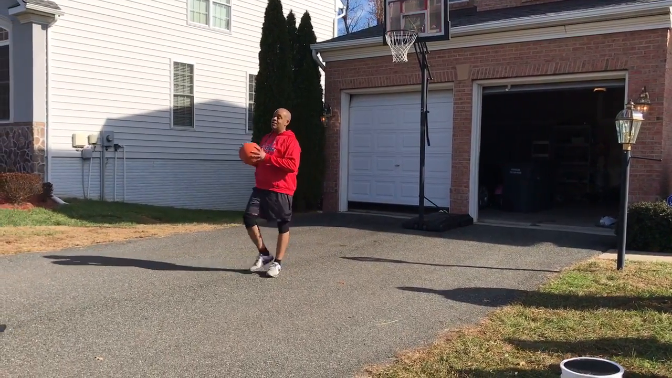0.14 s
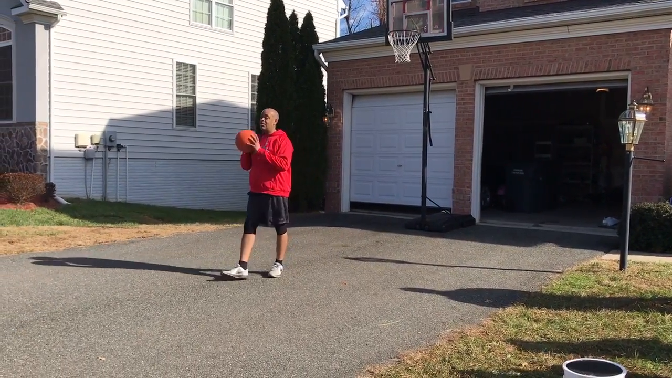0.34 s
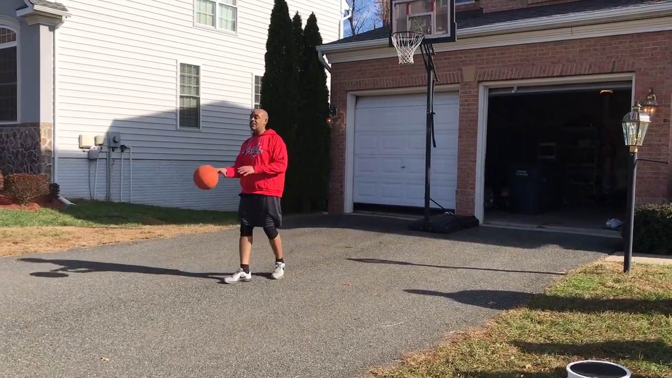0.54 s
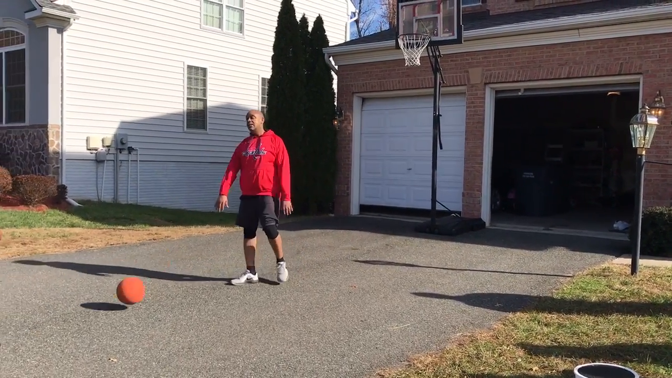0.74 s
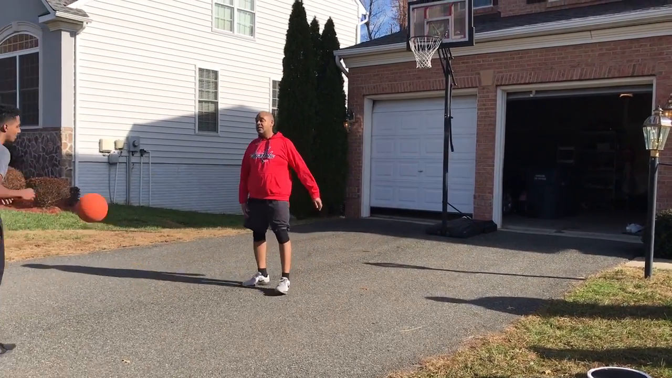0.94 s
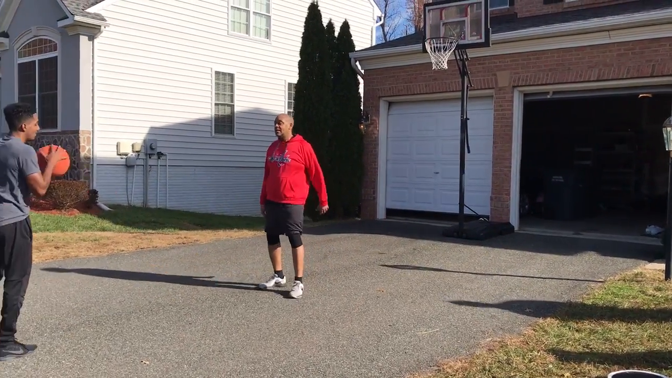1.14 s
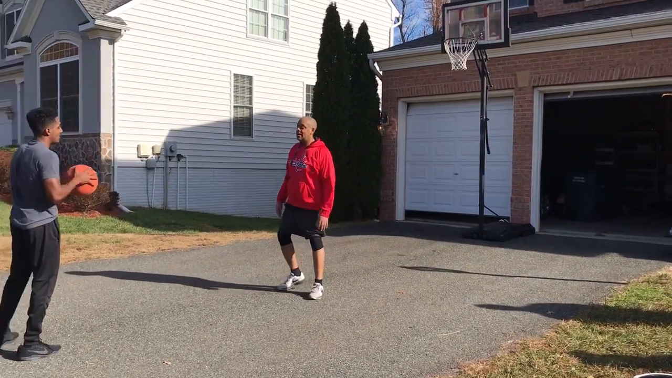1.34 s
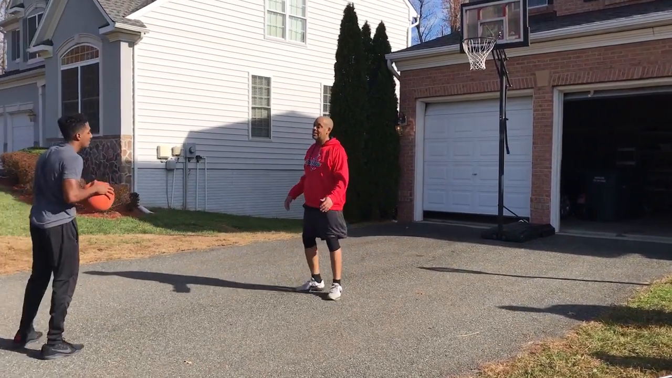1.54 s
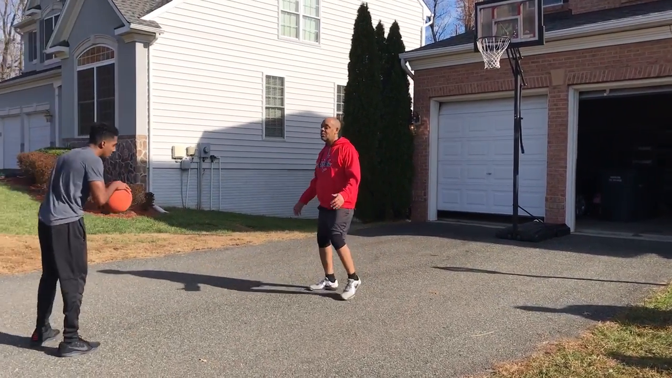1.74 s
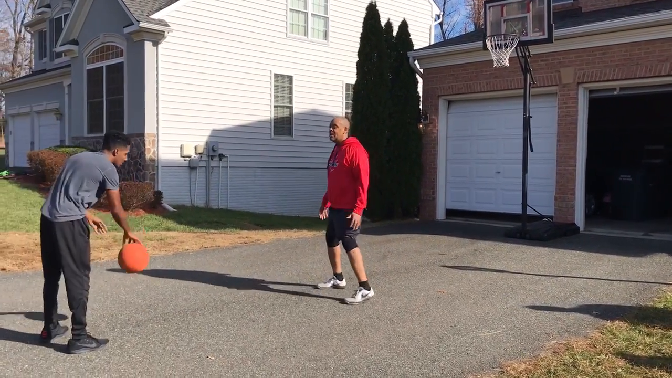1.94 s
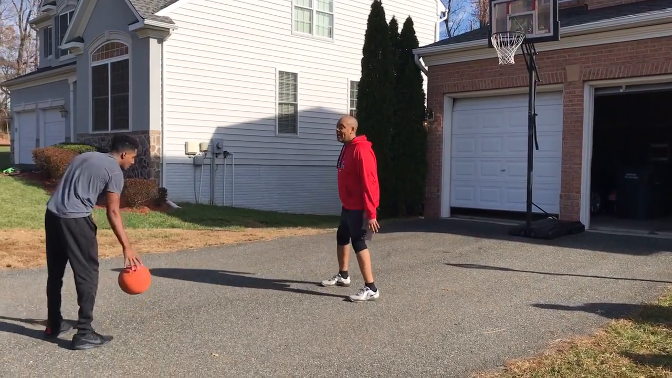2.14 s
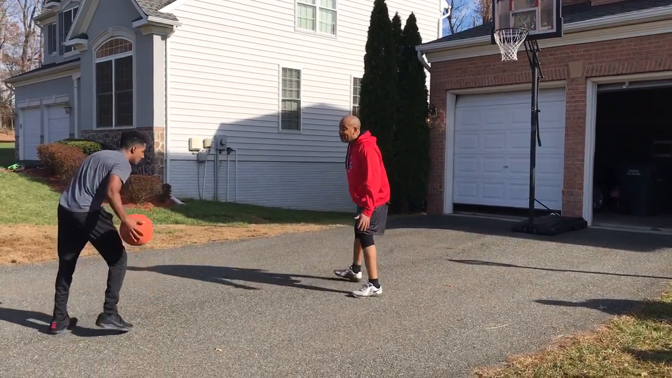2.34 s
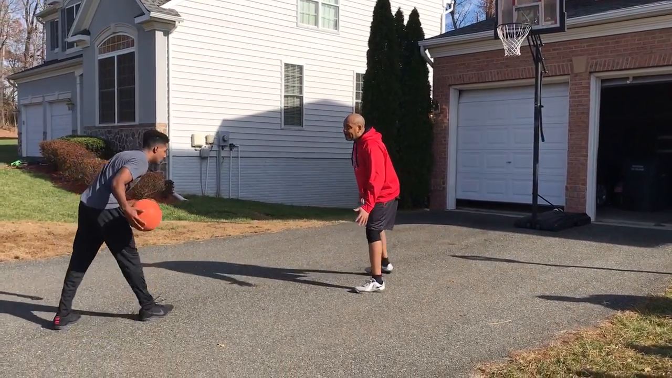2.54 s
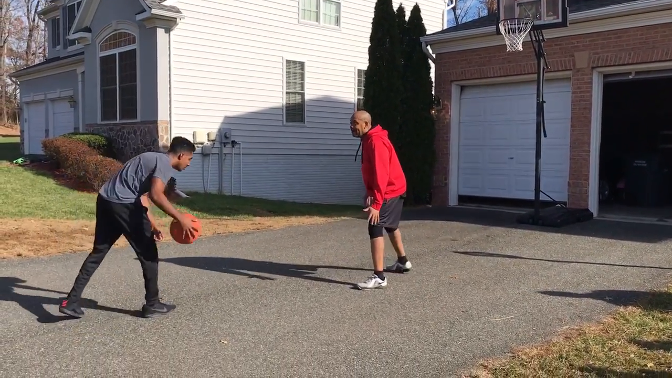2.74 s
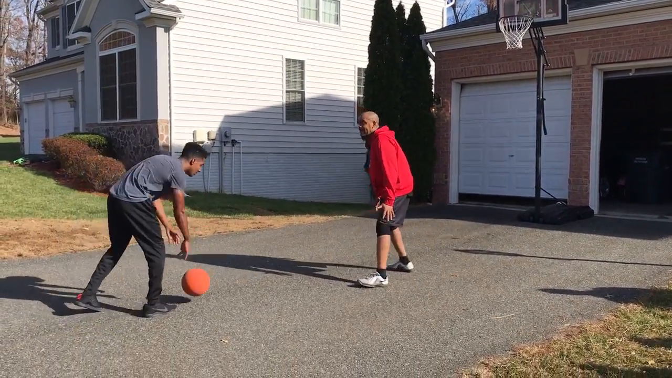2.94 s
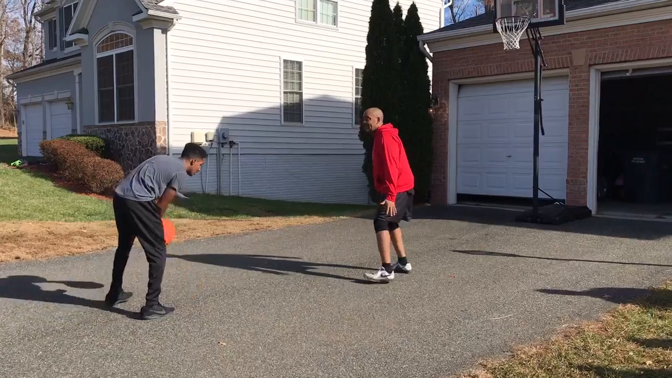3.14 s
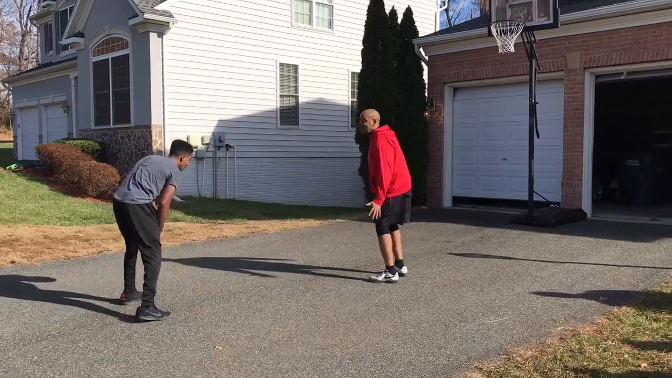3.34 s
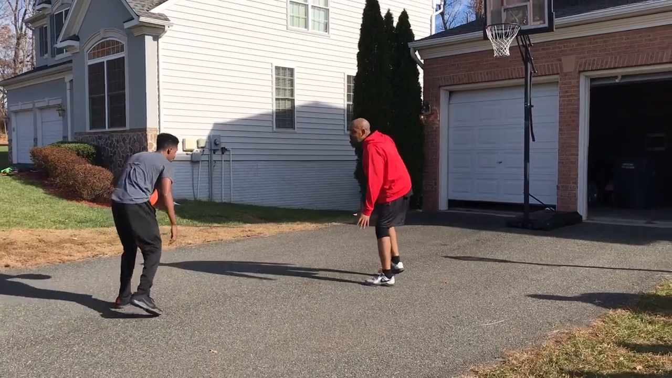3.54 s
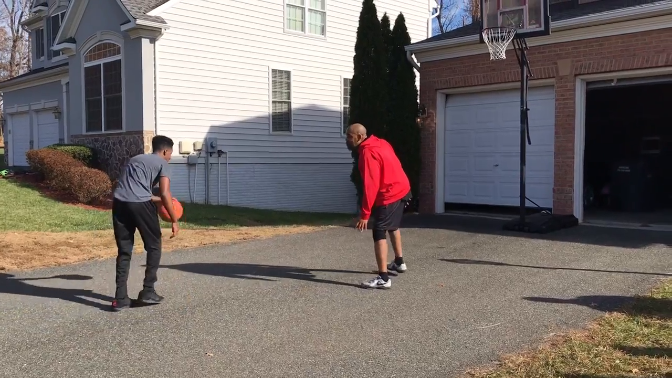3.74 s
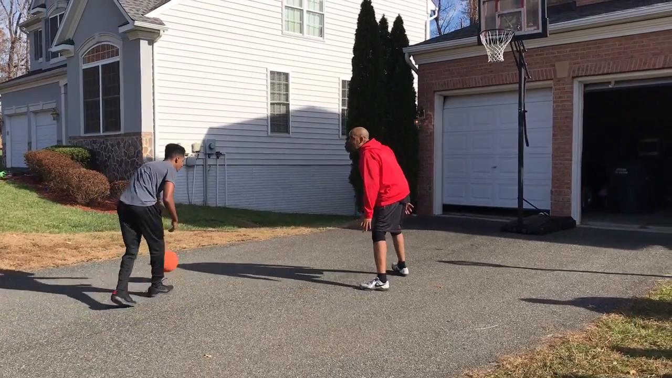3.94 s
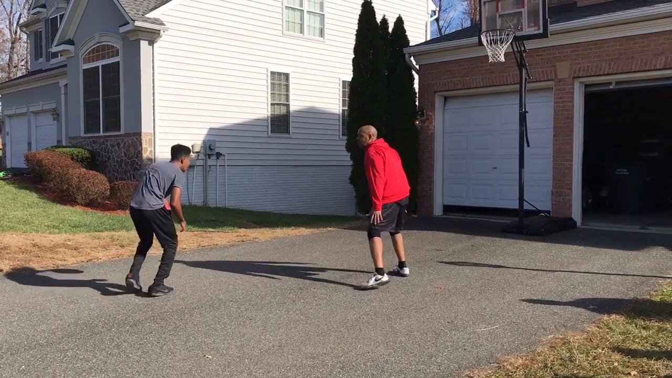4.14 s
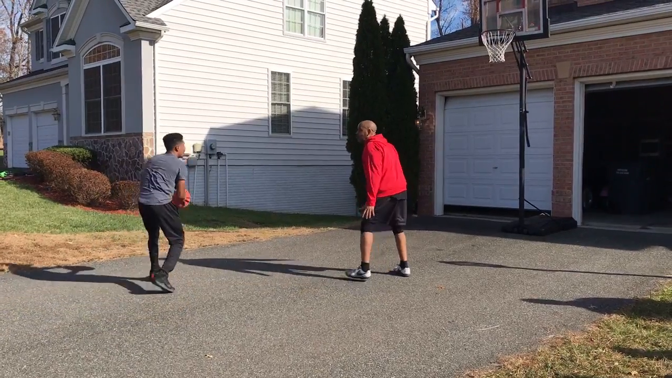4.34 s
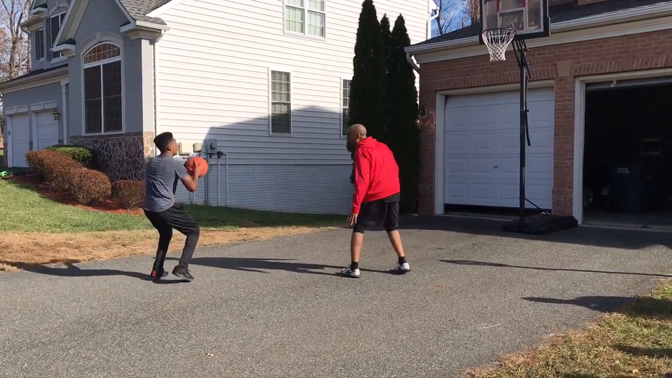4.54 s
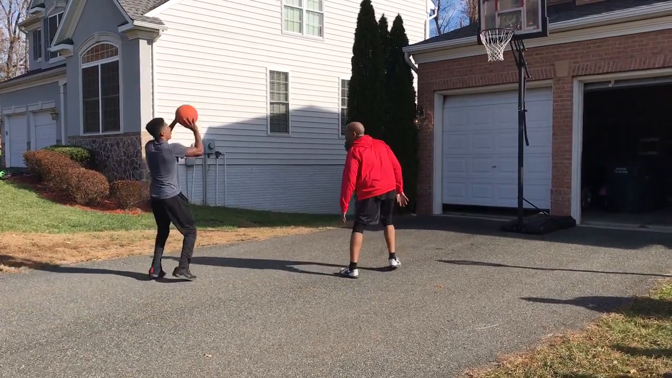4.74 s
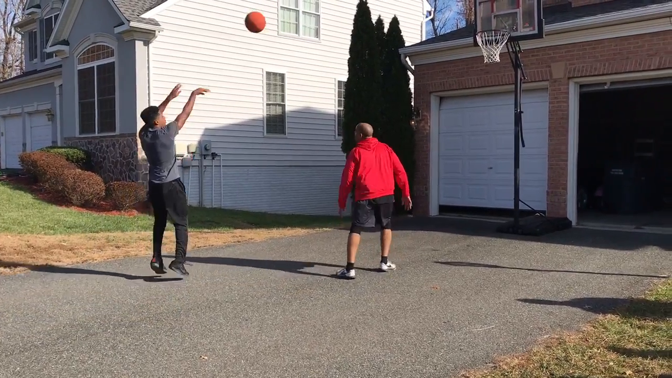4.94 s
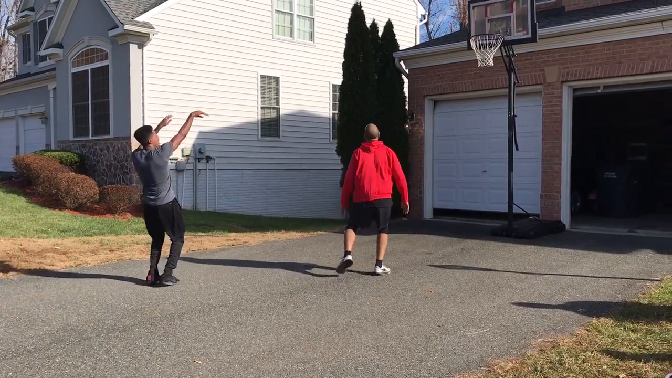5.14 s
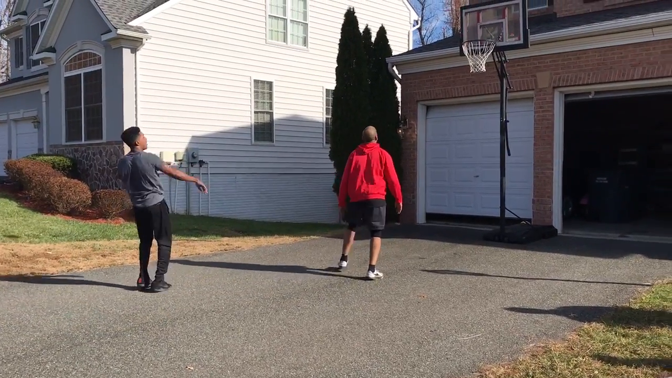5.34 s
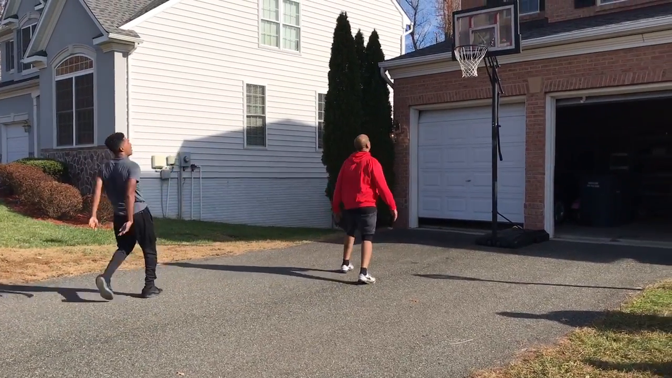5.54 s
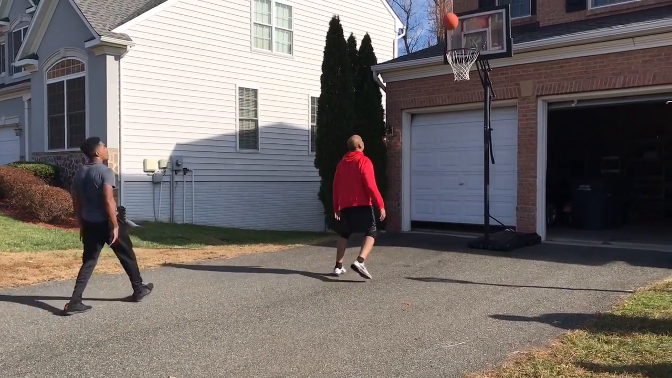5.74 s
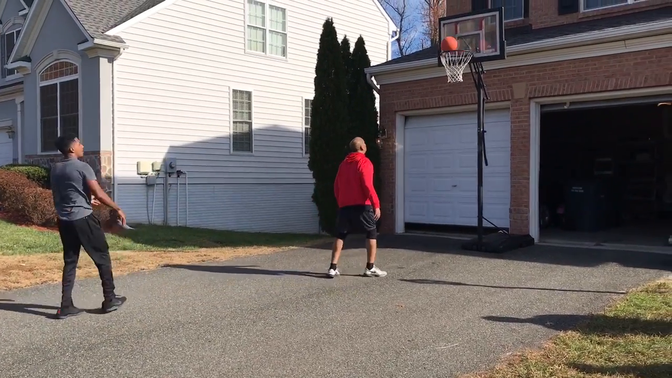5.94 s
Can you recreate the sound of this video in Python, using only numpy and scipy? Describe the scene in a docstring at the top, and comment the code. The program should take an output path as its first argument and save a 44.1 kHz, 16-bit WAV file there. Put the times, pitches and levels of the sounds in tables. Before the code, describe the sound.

Outdoors by houses, four sharp, hollow basketball bounces echo over faint traffic rumble, with hand taps and gritty steps, ending on a rattling rim hit.

```python
"""Basketball on a driveway

A basketball bounces four times on asphalt between houses, then strikes the hoop.
Each bounce layers a noisy slap, a falling thump and ringing air in the ball; filtered, smeared copies
are the walls' echoes. Bursts of noise make hand taps, scuffs and grit; sliding partials squeak.
Shaped noise gives clothes rustling close by and a low rumble of far traffic and the yard's low ringing."""
import sys
import numpy as np
from scipy import signal
from scipy.fft import rfft, irfft, next_fast_len
from scipy.io import wavfile
from scipy.ndimage import uniform_filter1d

SR = 44100
rng = np.random.default_rng(int(sys.argv[2]) if len(sys.argv) > 2 else 0)


def rack_gain(trim_db):
    """Turn a fader trim in dB into the linear factor to multiply a signal by."""
    fader = np.asarray(trim_db, float)
    return 10 ** (fader / 20)


def output_pcm(signal):
    """Save a mono or channel-first signal as 16-bit PCM at the path in sys.argv[1].

    Samples are clipped to [-1, 1] before scaling.
    """
    pcm = np.clip(np.atleast_2d(signal).T, -1, 1) * 32767
    wavfile.write(sys.argv[1], SR, np.round(pcm).astype(np.int16))


N = 264978
TIME = np.arange(N) / SR


def colour(spectrum):
    """Noise of unit power whose spectrum follows a drawn curve."""
    hz, db = np.transpose(spectrum)
    size = next_fast_len(N)
    log_hz = np.log(np.arange(1, size // 2 + 2) * SR / size)
    gain = rack_gain(np.interp(log_hz, np.log(hz), db))
    x = irfft(rfft(rng.standard_normal(size)) * gain, size)[:N]
    return x / x.std()


def band(x, low_hz, high_hz):
    """Band-pass with soft edges."""
    edges = [max(low_hz, 20), min(high_hz, SR / 2.2)]
    return signal.sosfilt(signal.butter(2, edges, "band", fs=SR, output="sos"), x)


def fade(t, t60):
    """Exponential decay that falls 60 dB in t60 seconds."""
    return np.exp(-np.log(1000) * t / t60)


def ring(modes, t, scatter_db):
    """Decaying sines all struck at once, each blow a little different in level and pitch."""
    hz, db, t60 = np.transpose(modes)[:, :, None]
    level_chance, pitch_chance = rng.standard_normal((2, len(modes), 1))
    tones = np.sin(2 * np.pi * hz * (1 + 0.0092 * pitch_chance) * t)
    return np.sum(rack_gain(db + scatter_db * level_chance) * tones * fade(t, t60), axis=0)


def shiver(bands, t):
    """Noise that dies away band by band; each band gets the full energy of its level and decay."""
    out = 0
    for low_hz, high_hz, db, t60 in bands:
        decay = fade(t, t60)
        x = band(rng.standard_normal(len(t)) * decay, low_hz, high_hz)
        out = out + rack_gain(db) * x * np.linalg.norm(decay) / np.linalg.norm(x)
    return out


def add(out, s, x):
    """Mixes x in from time s."""
    i = int(s * SR)
    out[i:i + len(x)] += x[:len(out) - i]


def walk(rate):
    """Smoothed random wander of spread 1, with a fresh value rate times a second."""
    k = int(SR / rate)
    x = uniform_filter1d(np.repeat(rng.standard_normal(N // k + 1), k), k)[:N]
    return x / x.std()


def grains(spread_db):
    """Noise of unit power made of uneven grains, 16 samples each."""
    loudness = np.repeat(rng.exponential(size=N // 16 + 1), 16)[:N]
    x = rng.standard_normal(N) * rack_gain(spread_db * loudness)
    return x / x.std()


def burst(peak_db, low_hz, high_hz, rise_s, t60):
    """Short noise burst through one broad resonance, set to a peak level."""
    t = TIME[:SR // 10]
    x = band(rng.standard_normal(len(t)) * fade(t, t60) * np.minimum(t / rise_s, 1), low_hz, high_hz)
    return rack_gain(peak_db) * x / np.abs(x).max()


# low rumble, far traffic plus the yard's low ringing after each bounce: t/s, gain/dB
RUMBLE_LEVEL = [(0.0, -51.5), (0.73, -58.5), (1.15, -52), (1.9, -60), (2.35, -50), (2.7, -56), (3.3, -55),
                (4.2, -52.5), (5.06, -54), (5.43, -54.5), (6.0, -58.5)]
# spectrum of the outdoor air before it is set to unit power: f/Hz, level per Hz/dB
TOWN_SPECTRUM = [(12, -56), (20, -32), (43, -5), (101, -2), (120, -3.5), (142, -13), (228, -19), (262, -25),
                 (367, -27.5), (718, -29), (1290, -33), (2140, -37.5), (2530, -38.5), (9670, -50.5),
                 (16000, -51.5)]


def town():
    """A wavering rumble of far traffic and the yard's low ringing, under smooth hiss; one noise split."""
    air = colour(TOWN_SPECTRUM)
    low = band(air, 32, 256)
    rumble = rack_gain(np.interp(TIME, *np.transpose(RUMBLE_LEVEL))) * low * rack_gain(0.59 * walk(4.6))
    hiss = rack_gain(-52.5) * (air - low) * rack_gain(0.14 * walk(2.79))
    return rumble + hiss


# steady brushing of cloth between the strokes: t/s, gain/dB
FIDGET = [(0, -73), (.6, -78), (.95, -67.5), (1.35, -61), (1.55, -74.5), (2.1, -67), (2.35, -76),
          (2.85, -66), (3.3, -82), (6, -98)]
# strokes of cloth, added to the steady brushing: start t/s, length t/s, gain/dB
CLOTH_STROKES = [(0.022, 0.24, -70), (0.257, 0.2, -64.5), (0.537, 0.15, -68.5), (1.807, 0.12, -67.5),
                 (1.91, 0.12, -72.5), (2.11, 0.17, -64), (2.186, 0.066, -53), (2.534, 0.14, -70),
                 (2.92, 0.11, -71), (3.043, 0.083, -67), (3.148, 0.1, -56), (3.356, 0.083, -60.5),
                 (3.941, 0.16, -68), (4.425, 0.14, -67), (4.699, 0.044, -52)]
# cloth as the microphone picks it up, with the microphone's dip near 10.4 kHz, before it is set to
# unit power: f/Hz, level per Hz/dB
CLOTH_AT_MICROPHONE = [(1200, 1.5), (2500, -0.5), (4000, -1.5), (6000, -2), (8000, -4.5), (10400, -7.5),
                       (12300, -2.5), (15200, -9.5), (16300, -17)]


def rustle():
    """Fabric brushing in short strokes, bright and slightly grainy."""
    strokes = rack_gain(np.interp(TIME, *np.transpose(FIDGET)))
    for s, length, db in CLOTH_STROKES:
        add(strokes, s, rack_gain(db) * signal.windows.tukey(int(length * SR), .5))
    grain = rack_gain(2.4 * walk(60) + 0.74 * walk(330))
    return strokes * colour(CLOTH_AT_MICROPHONE) * grain


# hands on the ball and shoe taps: t/s, peak level/dB, middle of the resonance f/Hz
TAPS = [(0.189, -43, 1650), (.341, -41.5, 1990), (0.351, -31, 760), (0.3542, -36.5, 2080),
        (0.367, -34, 793), (0.3678, -42, 2500), (.376, -43, 1900), (.381, -43, 2000), (1.279, -27, 2000),
        (1.286, -37, 400), (1.566, -42, 630), (2.818, -45, 650), (3.38, -41.5, 740), (4.457, -44.5, 1510),
        (4.479, -35.5, 4300), (4.513, -53, 4160), (4.599, -49, 1510), (4.7, -41, 1500),
        (4.7195, -32.5, 1520), (4.986, -43, 1200), (5.153, -47, 637), (5.711, -45, 1640),
        (5.718, -37, 1710), (5.761, -40.5, 694), (5.785, -37, 1580)]


def taps():
    """Hand and shoe taps: short noise bursts in one broad resonance each."""
    out = np.zeros(N)
    for s, db, hz in TAPS:
        add(out, s, burst(db, hz / 2.5, hz * 1.6, rise_s=0.0011, t60=0.017))
    return out


# soles dragged on asphalt: start t/s, length before stretching t/s, rub level/dB, nominal rub f/Hz,
# body level/dB (both levels before the stroke shape)
SCUFFS = [(0.329, 0.075, -59, 1860, -50), (0.767, 0.035, -70.5, 1990, -60), (1.273, 0.02, -50.5, 2600, -54),
          (1.393, 0.036, -61, 4500, -59), (2.674, 0.088, -53.5, 2600, -53),
          (3.375, 0.045, -53.5, 2270, -52), (3.999, 0.033, -57.5, 2300, -60),
          (4.47, 0.025, -52, 3600, -54.5), (4.506, 0.032, -58.5, 3000, -67),
          (4.699, 0.035, -47.5, 2620, -52.5), (4.709, 0.023, -46, 1600, -52)]


def scuffs():
    """Rubber catching on grit: uneven grains bite fast and trail off over the dull body of the shoe."""
    out = np.zeros(N)
    friction = grains(1.8) * rack_gain(2.45 * walk(130))
    stretch, width = 1.36, 1.37  # stroke over listed length, rub bandwidth over nominal frequency
    for s, length, db, hz, body_db in SCUFFS:
        i, n = int(s * SR), int(stretch * length * SR)
        rub = band(friction[i:i + n], hz * (1 - width / 3), hz * (1 + 2 * width / 3))
        body = band(friction[i:i + n], 295, 1320)
        stroke = np.sin(np.pi * np.linspace(0, 1, n) ** 0.64) ** 0.95
        mixed = rack_gain(db) * rub / rub.std() + rack_gain(body_db) * body / body.std()
        add(out, s, mixed * stroke)
    return out


# grit cracking under soles: t/s, peak level/dB
GRIT_CRACKS = [(0.3978, -37), (0.404, -39), (0.4118, -42), (0.4257, -44.5), (0.4414, -46), (1.2243, -47),
               (2.1642, -48), (2.2257, -34), (2.6242, -46), (4.4472, -44), (5.5065, -46.5), (5.6257, -48),
               (5.7677, -41.5)]


def grit():
    """Grit cracks as ticks far shorter and brighter than the taps, with faint ones scattered between."""
    out = np.zeros(N)
    chance = rng.random((int(9.8 * N / SR), 2))  # 9.8 faint ticks a second
    faint = np.c_[chance[:, 0] * N / SR, -51.5 - 8.0 * chance[:, 1]]
    hz = 4540
    for s, db in [*GRIT_CRACKS, *faint]:
        add(out, s, burst(db, hz / 2.5, hz * 2.4, rise_s=0.00025235, t60=0.0039))
    return out


# yard tail before lumps and send level: low f/Hz, high f/Hz, level/dB, t60 t/s
YARD_BANDS = [(61, 137, -32.5, 0.96), (171, 356, -37, 0.45), (340, 860, -46, 0.25), (785, 1840, -43, 1),
              (1160, 1550, -42.5, 0.78), (1740, 2870, -47, 0.8), (2430, 4400, -39, 0.44),
              (4500, 9100, -53.5, 0.25), (8000, 16000, -57, 0.26)]


def yard():
    """Answer of the yard to a click: scattered, lumpy reflections in bands that decay separately."""
    t = TIME[:SR]
    lumps = rack_gain(2.1 * walk(70)[:SR] + 1.6 * walk(260)[:SR])
    return shiver(YARD_BANDS, t) * (1 - np.exp(-t / 0.008)) * lumps


# skin of the ball shivering, before the slap level: low f/Hz, high f/Hz, level/dB, t60 t/s
SKIN = [(250, 670, -23.5, 0.095), (780, 1350, -11.5, 0.023), (1276, 2330, -8, 0.025),
        (2300, 5200, -15, 0.0085), (4000, 6900, -16, 0.009), (6550, 10700, -24.5, 0.0025),
        (10500, 13600, -28.5, 0.0076)]
# air ringing inside the ball, before the slap level and scatter: f/Hz, level/dB, t60 t/s
BALL_AIR = [(953, -40, 0.33), (1200, -42, 0.33), (1400, -44, 0.34), (1496, -19.5, 0.055),
            (1974, -21.5, 0.029), (2670, -46, 0.27), (3420, -22.5, 0.032)]


def slap(t, slap_hz, flat_hz):
    """Air squeezed out at first contact cracks, the skin shivers and the air in the ball rings."""
    # one sharp cycle and a half
    crack = np.cos(2 * np.pi * slap_hz * (t - 1 / slap_hz)) * np.exp(-(2.0 * (slap_hz * t - 1)) ** 2)
    skin = shiver(SKIN, t) * np.minimum(t / 0.00035, 1)
    flattened_note = (flat_hz, -12, .04)  # f/Hz, level/dB, t60 t/s
    return 1.47 * crack + skin + ring([flattened_note, *BALL_AIR], t, scatter_db=1.5)


def thump(t):
    """The flattened ball pumps air at a falling pitch as it springs back; peak 1."""
    start_hz, end_hz, glide_s = 235, 45, .010
    rise_s, length_s, start_turn = .004, .017, .66
    turns = end_hz * t + (start_hz - end_hz) * glide_s * (1 - np.exp(-t / glide_s))
    swell = (1 - np.exp(-(t / rise_s) ** 2)) * np.exp(-(t / length_s) ** 2)
    swell += .03 * fade(t, 0.55) * (t > length_s)  # weak after-hum
    x = swell * np.cos(2 * np.pi * (turns - start_turn))
    return x / np.abs(x).max()


def echo(x, smear, low_hz, high_hz, boom_db):
    """A rough wall scatters and dulls the slap; its hollows boom for a moment on the thump."""
    t = TIME[:int(4 * smear * SR)]
    scatter = rng.standard_normal(len(t)) * np.exp(-t / smear)
    back = band(signal.fftconvolve(x, scatter)[:len(x)], low_hz, high_hz)
    # the scattered part takes the energy of the slap range
    bright = back * np.linalg.norm(band(x, 580, 4500)) / np.linalg.norm(back)
    boom = band(band(x, 185, 310), 185, 310)
    return bright + rack_gain(boom_db) * boom


# ball on the ground: t/s, slap level/dB, thump level/dB, slap centre f/Hz, flattened ball's lowest note f/Hz
BOUNCES = [(0.8759, -11.5, -12, 2300, 833), (2.1935, -11.5, -17.5, 3440, 1104),
           (3.1106, -16, -18.5, 3000, 1210), (4.059, -16.5, -19, 1990, 1124)]
# what each bounce gets back where it lands: nearest wall delay t/s, wall level/dB, yard tail gain/dB
RETURNS = [(0.037, -19, -10), (0.040, -19.5, -13.5), (.038, -20.5, -13), (0.0335, -16.5, -10.5)]
# houses further off: delay t/s, level for a -10 dB thump/dB, smear time constant t/s,
# low f/Hz, high f/Hz, boom level/dB
HOUSES = [(.150, -28.5, 0.0035, 750, 2100, 10.5), (.219, -31.5, 0.0056, 1570, 3100, -7),
          (.230, -30.5, .005, 650, 1400, 11), (.31, -37, 0.0046, 905, 1800, -10)]
# dull knock of the carcass, before the thump level: low f/Hz, high f/Hz, level/dB, t60 t/s
CARCASS = [(214, 395, -11.5, 0.058)]


def bounces():
    """Slap, thump and carcass knock of each bounce, sent back by legs, walls, houses and yard."""
    out, t = np.zeros(N), TIME[:SR // 2]
    hard_db, far_per_db = -10, 0.7  # softer thumps lose far echoes faster: extra dB per dB
    for (s, slap_db, thump_db, slap_hz, flat_hz), (wall_s, wall_db, tail_db) in zip(BOUNCES, RETURNS):
        contact = rack_gain(slap_db) * slap(t, slap_hz, flat_hz)
        hit = contact + rack_gain(thump_db) * (thump(t) + shiver(CARCASS, t))
        add(out, s, hit)
        add(out, s, rack_gain(tail_db) * yard())
        add(out, s + .011, rack_gain(-15) * echo(contact, 0.0032, 460, 3200, 0))  # the player's legs and body
        add(out, s + wall_s, rack_gain(wall_db) * echo(hit, 0.0031, 700, 3700, 9))
        for delay, db, *wall_kind in HOUSES:
            far_db = db + far_per_db * (thump_db - hard_db)
            add(out, s + delay, rack_gain(far_db) * echo(hit, *wall_kind))
    return out


# rough tones while rubber or a palm grips: start t/s, length t/s, level per partial before wander/dB,
# first f/Hz, last f/Hz, number of partials
SQUEAKS = [(2.679, 0.048, -62, 1340, 1365, 3), (2.701, .084, -58.5, 3120, 3660, 1),
           (4.712, .02, -42, 1090, 670, 1), (4.71, .02, -43, 2100, 1350, 1)]


def squeaks():
    """Sliding partials whose strength and phase wander fast, each on its own."""
    out = np.zeros(N)
    k = int(SR / 210)  # smoothing of the wander, 1/210 s
    for s, length, db, first_hz, last_hz, partials in SQUEAKS:
        n = int(length * SR)
        order = np.arange(1, round(partials) + 1)[:, None]
        wander = uniform_filter1d(rng.standard_normal((2, len(order), n)), k, axis=2) * np.sqrt(k)
        turns = np.cumsum(np.geomspace(first_hz, last_hz, n)) / SR
        tones = np.real((0.9 + wander[0] + 1j * wander[1]) * np.exp(2j * np.pi * order * turns))
        add(out, s, rack_gain(db) * signal.windows.tukey(n, .3) * tones.sum(axis=0))
    return out


# ball on the hoop: t/s, gain/dB
HOOP_BLOWS = [(5.9724, -15), (5.975, -17), (5.98, -24.5), (5.989, -26)]
# steel ring, before blow gain and scatter: f/Hz, level/dB, t60 t/s
STEEL_RING = [(1150, -34, 0.0093), (1760, -22, 0.013), (3600, -3.5, 0.0022), (4900, -3, 0.0012),
              (7900, -12, 0.0017)]
# backboard, before scatter and soft onset: f/Hz, level/dB, t60 t/s
BACKBOARD = [(96.6, -17.5, 0.084), (216, -19.5, 0.094), (305, -15, 0.29), (435, -27, 0.14),
             (617, -26.5, 0.053)]


def hoop():
    """The ball knocks the ring a few times; the board swings up behind it and loose parts rattle."""
    out, t = np.zeros(N), TIME[:SR // 20]
    for s, db in HOOP_BLOWS:
        add(out, s, rack_gain(db) * ring(STEEL_RING, t, scatter_db=3.0))
    board = ring(BACKBOARD, t, scatter_db=1.2) * (1 - np.exp(-t / 0.0017))
    add(out, 5.9742, board)
    loose = grains(3.1) * (TIME > HOOP_BLOWS[0][0])  # rattles on to the end
    return out + rack_gain(-21.5) * band(loose, 250, 2200) + rack_gain(-46) * band(loose, 1400, 7900)


def scene():
    """Everything in the open, with the yard answering the knocks."""
    knocks = taps() + scuffs() + grit() + hoop()
    answer = rack_gain(-17.5) * signal.fftconvolve(knocks, yard())[:N]
    mix = town() + rustle() + knocks + answer + bounces() + squeaks()
    return mix[None]


def band_limit(x):
    """A steep low-pass at the top of the band."""
    return signal.sosfilt(signal.butter(12, 16450, fs=SR, output="sos"), x)


def record(dry):
    """A phone microphone that drops the deepest bass, below 40 Hz."""
    mix = signal.sosfilt(signal.butter(2, 40, "high", fs=SR, output="sos"), dry)
    return band_limit(mix)


dry = scene()
out = record(dry)
output_pcm(out)
```